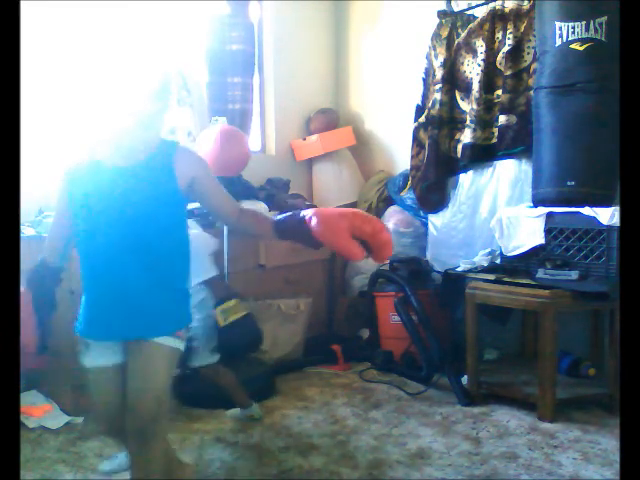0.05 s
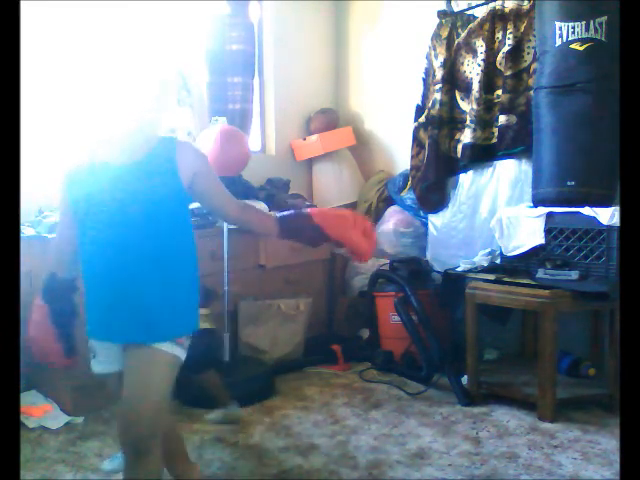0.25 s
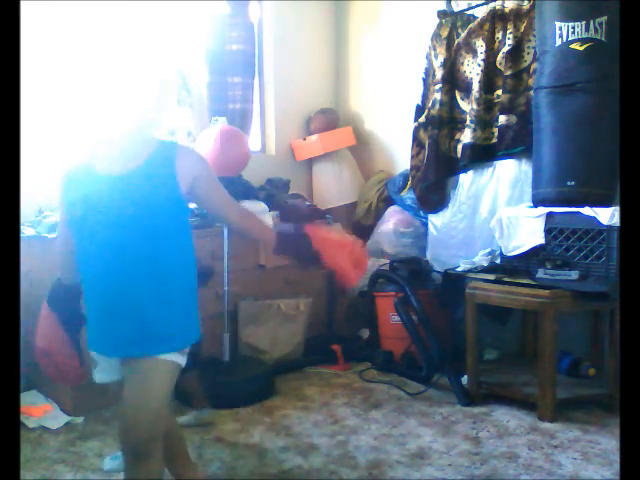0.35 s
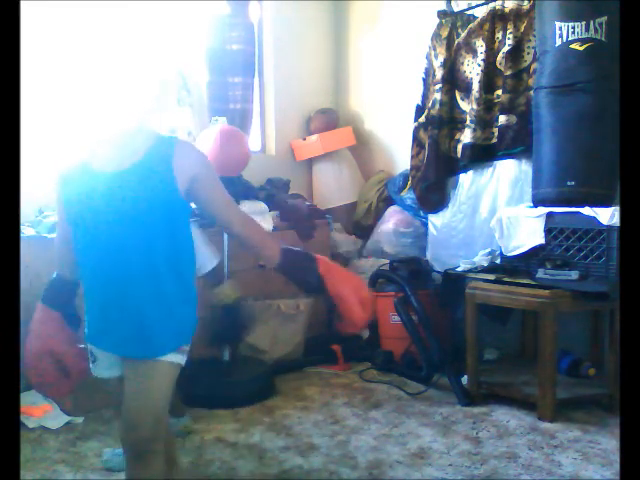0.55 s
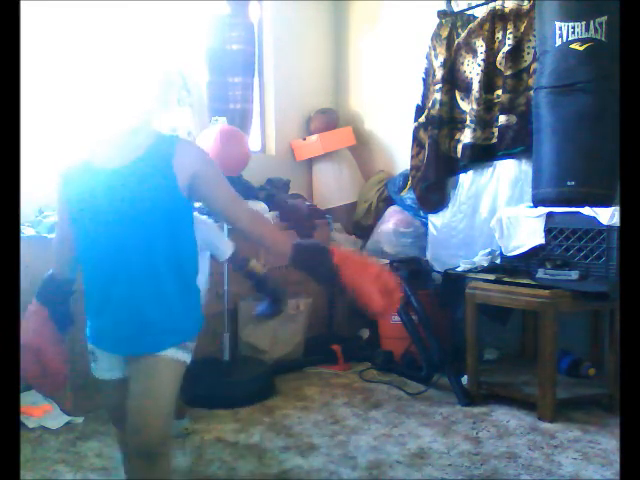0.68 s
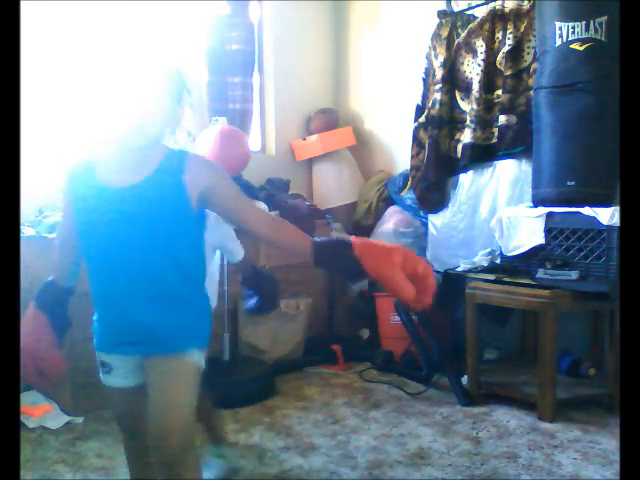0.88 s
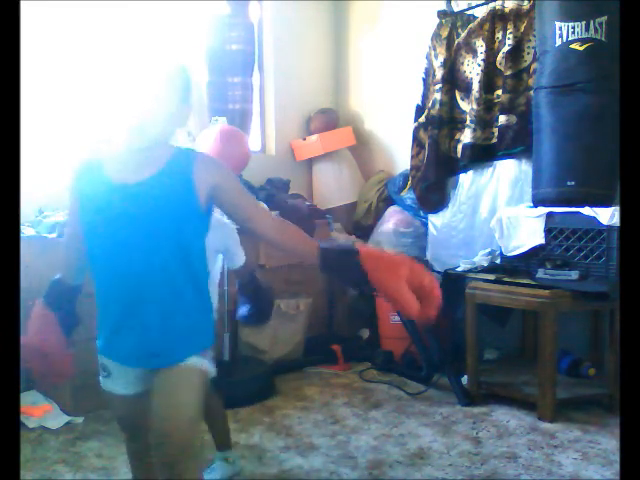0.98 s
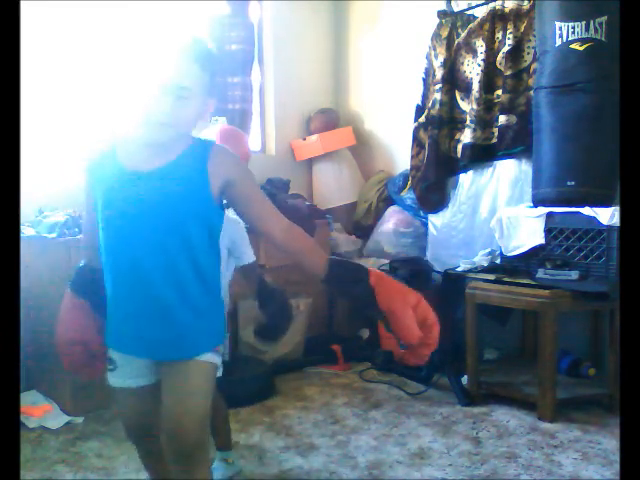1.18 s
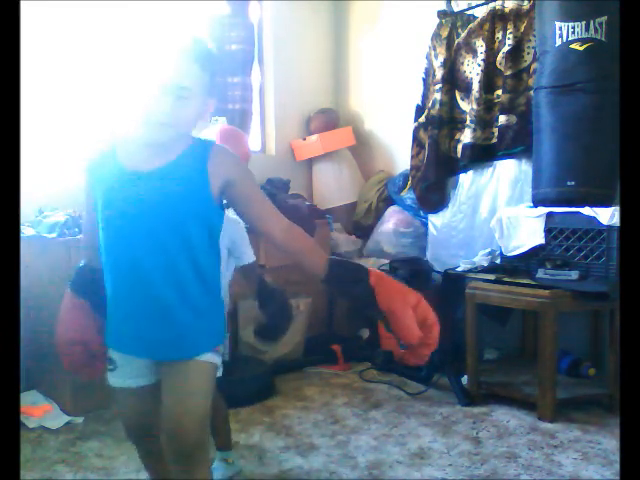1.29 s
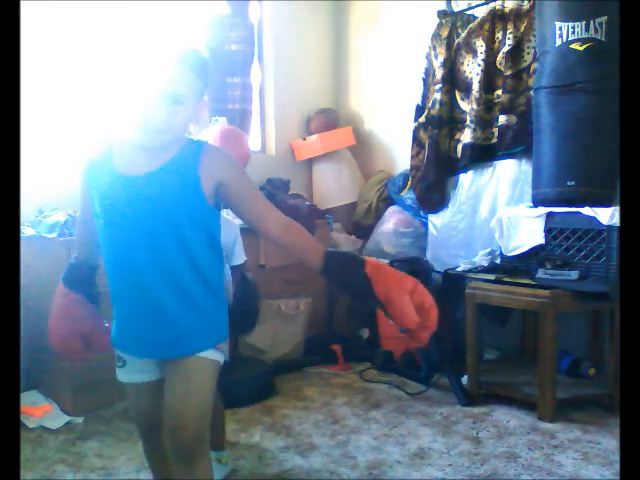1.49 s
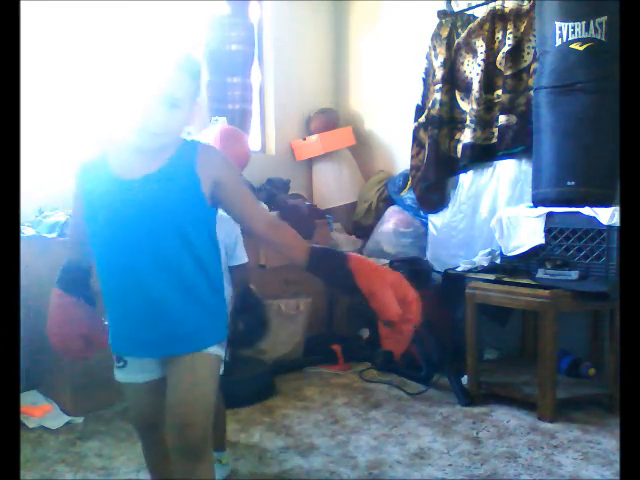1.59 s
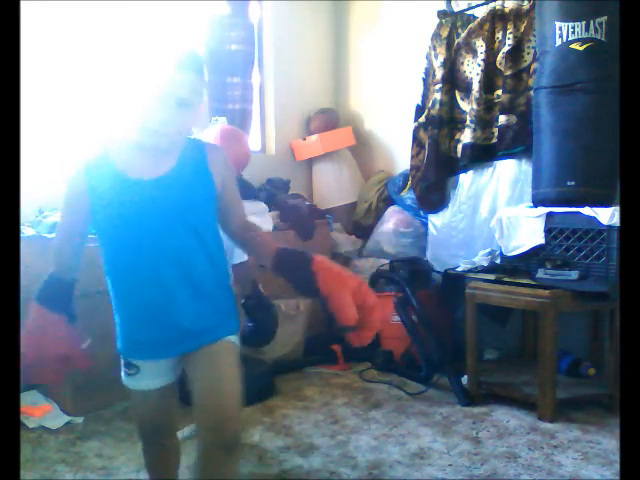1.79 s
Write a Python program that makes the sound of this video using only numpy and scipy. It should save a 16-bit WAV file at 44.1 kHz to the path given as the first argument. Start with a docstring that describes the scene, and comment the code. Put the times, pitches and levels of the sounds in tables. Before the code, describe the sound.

Dull footsteps land on a carpeted wooden floor, heard from close by. A heavy step thumps at about 0.2 seconds with a short rumble, followed by light foot contacts. A second heavy step comes at about 1.1 seconds, its low rumble lingering briefly, and a last light one at 1.5 seconds. Feet and clothes brush faintly in between, and a low room hum continues throughout.

```python
"""Footsteps on a carpeted wooden floor, heard from close by.
From the start a low drone, mains hum and room noise sound, and feet and clothes brush faintly.
At 0.2 s a heavy step lands: heel and ball each drive the low modes of floor and room, slap the carpet
and leave a short dull rumble. Light contacts follow, a second heavy step at 1.06 s whose rumble lingers,
and a last light one at 1.54 s. Throughout, a cheap recorder adds a thin buzz near 4 kHz to loud bass."""
import sys
import numpy as np
from scipy import signal
from scipy.fft import rfft, irfft, next_fast_len
from scipy.io import wavfile
from scipy.ndimage import map_coordinates

SR = 44100
rng = np.random.default_rng(int(sys.argv[2]) if len(sys.argv) > 2 else 0)


def to_wav(s):
    """Save 16-bit WAV."""
    ch = np.atleast_2d(s).T  # columns
    pcm = np.round(np.clip(ch, -1, 1) * 32767)  # PCM
    wavfile.write(sys.argv[1], SR, pcm.astype(np.int16))


N = 81585

# Faint overtones of the drone: f/Hz, level/dB
DRONE_OVERTONES = [(308, -78.5), (366, -73.5), (631, -80), (788, -81), (903, -79.5), (1129, -87),
                   (1890, -90.5), (2100, -91)]
# Spectrum of the room noise: f/Hz, relative density/dB
AIR_SPECTRUM = [(25, -14.5), (55, 2.5), (100, 3), (200, -4.5), (400, -8), (700, -12.5), (1000, -15.5),
                (2000, -23.5), (2900, -32.5), (5000, -34.5), (9000, -38), (11500, -45.5), (15000, -55)]
# Feet and clothes brushing; the 119 Hz row is low rumble lingering after the second heavy step:
# middle t/s, length/s, level/dB, centre f/Hz, width/octaves
NOISE_SWELLS = [(0.022, 0.1, -68.5, 1540, 0.21), (0.102, 0.068, -60.5, 840, 0.23),
                (0.328, 0.076, -63.5, 668, 0.51), (0.638, 0.13, -66.5, 650, .6),
                (0.859, 0.085, -74, 1796, .3), (0.901, 0.04, -82, 3160, 0.057),
                (0.952, 0.053, -64, 506, 0.62), (1.14, 0.13, -59.5, 334, 0.48),
                (1.165, 0.15, -77.5, 1540, 0.18), (1.17, 0.14, -47, 119, 0.14),
                (1.316, 0.037, -68.5, 1260, 0.22), (1.387, 0.053, -65, 525, 0.36),
                (1.536, 0.062, -63.5, 737, 0.61), (1.554, 0.049, -84.5, 8700, 0.13)]
# Foot contacts: t/s, force level/dB, softness (time constant)/ms, rumble level/dB, slap level/dB
CONTACTS = [(0.2112, 2, 0.52, -38, -40.5), (0.2169, .2, 0.74, -43, -60), (0.2563, 0.5, 0.94, -46.5, -65),
            (0.2831, -16.5, 0.94, -44, -62), (0.317, -20.5, 0.8, -45.5, -59), (0.4438, -22, 2.13, -57, -59),
            (1.054, -22, 1.33, -55.5, -60), (1.0622, -2.5, 1.64, -56, -69), (1.0701, -9, 1.78, -54, -68),
            (1.169, -22, 2.1, -56.5, -72), (1.1853, -17.5, 2.7, -45, -72), (1.221, -22, 2.8, -59, -68),
            (1.538, -32, 2.3, -46.5, -55)]
# Normal modes of the wooden floor: f/Hz, level/dB, T60/s
FLOOR_RESONANCES = [(37.3, -18, .24), (74.7, -1.5, 0.075), (85, -5.5, 0.097), (121.3, -16.5, 0.085),
                    (129.4, -13, 0.035), (147.5, -28, 0.19), (168, -43.5, 0.053), (202.9, -22.5, 0.22),
                    (256, -27, 0.27)]
# Standing waves between the walls: f/Hz, level/dB, T60/s
ROOM_MODES = [(58.38, -15, 0.58), (118.6, -36, 0.61)]
# Spectrum of a sole meeting carpet: f/Hz, relative density/dB
SLAP_SPECTRUM = [(100, -15), (300, 3.5), (520, 3.5), (750, -17.5), (1300, -29.5), (3000, -51.5),
                 (8000, -91.5)]
# Spectrum of the rumble of room and furniture: f/Hz, relative density/dB
RUMBLE_SPECTRUM = [(25, -19.5), (50, -3.5), (130, 3.5), (190, -2.5), (270, -5.5), (350, -11.5), (600, -25),
                   (1000, -37.5), (2500, -71.5), (8000, -100)]
# Modulation at 1, 2 and 3 times BUZZ_HZ: depth/dB
BUZZ_DEPTHS = [-51.5, -67.5, -77.5]

DRONE_HZ, DRONE_DB, DRONE_WAVER_DB = 58.3, -49.5, 0.8
MAINS_HZ, MAINS_DB = 123.1, -52.5
AIR_DB, AIR_WAVER_DB = -58, -0.21
LOW_CUT_HZ, BUZZ_HZ, BAND_LIMIT_HZ = 21.4, 3900, 15200


def amp(db):
    """Amplitude ratio of a level in decibels."""
    return 10 ** (np.asarray(db) / 20)


def unit(x):
    """Normalisation to an rms of 1."""
    return x / np.sqrt(np.mean(x ** 2) + 1e-20)


def since(start_s):
    """Seconds elapsed since start_s, zero before it."""
    return np.maximum(np.arange(N) / SR - start_s, 0)


def filtered(x, response):
    """Linear filtering: the spectrum of x is multiplied by a frequency response."""
    size = next_fast_len(N + SR)
    return irfft(rfft(x, size) * response(np.fft.rfftfreq(size, 1 / SR)), size)[:N]


def noise(spectrum):
    """Spectral shaping: noise of rms 1 follows (f/Hz, level/dB) points on a log frequency axis."""
    f, db = np.transpose(spectrum)
    response = lambda hz: amp(np.interp(np.log(hz + 1), np.log(f + 1), db))
    return unit(filtered(rng.standard_normal(N), response))


def wobble(rate):
    """Spline interpolation: a smooth curve through `rate` random values a second."""
    return map_coordinates(rng.standard_normal(256), [np.arange(N) * rate / SR], mode="mirror")


def ring(hz, db, t60_s):
    """Impulse response of a damped oscillator, falling 60 dB in t60_s."""
    t = since(0)
    return amp(db - 60 * t / t60_s) * np.sin(2 * np.pi * hz * t)


def burst(start_s, db, spectrum, rise_s, t60_s):
    """Exponential rise and decay of coloured noise."""
    t = since(start_s)
    return noise(spectrum) * (1 - np.exp(-t / rise_s)) * amp(db - 60 * t / t60_s)


def hum():
    """Periodic vibration gives a line spectrum: a drone, probably a fan motor, and steady mains hum."""
    t = since(0)
    drone = amp(DRONE_DB + DRONE_WAVER_DB * wobble(rate=5.5)) * np.sin(2 * np.pi * DRONE_HZ * t)
    whines = sum(amp(db) * np.sin(2 * np.pi * hz * t + wobble(rate=14)) for hz, db in DRONE_OVERTONES)
    mains = amp(MAINS_DB) * np.sin(2 * np.pi * MAINS_HZ * t)
    return np.sqrt(2) * (drone + whines + mains)  # the levels are rms


def room_air():
    """Random pressure fluctuations give a continuous spectrum; its level wavers slightly."""
    return amp(AIR_DB + AIR_WAVER_DB * wobble(rate=6.5)) * noise(AIR_SPECTRUM)


def brushes_and_lingering_rumble():
    """Noise bands swell and fade: friction of feet and cloth, and a low rumble, probably a room mode."""
    t, sound = since(0), np.zeros(N)
    for middle_s, length_s, db, centre_hz, octaves in NOISE_SWELLS:
        band = lambda hz: np.exp(-.5 * (np.log2((hz + 1) / centre_hz) / octaves) ** 2)
        envelope = amp(db) * np.exp(-2 * ((t - middle_s) / length_s) ** 2)
        sound += envelope * unit(filtered(rng.standard_normal(N), band))
    return sound


def thumps():
    """Modal superposition: force pulses, rounded by the carpet, ring the modes of floor and room."""
    force = np.zeros(N)
    for start_s, db, softness_ms, _, _ in CONTACTS:
        age = since(start_s) * 1000 / softness_ms
        push = age ** 2 * np.exp(-age)
        force += amp(db) * push / push.sum()
    # Neighbouring floor modes swing opposite ways.
    floor = sum((-1) ** k * ring(*mode) for k, mode in enumerate(FLOOR_RESONANCES))
    room = sum(ring(*mode) for mode in ROOM_MODES)
    return signal.fftconvolve(force, floor - room)[:N]


def slaps():
    """Impact noise: each sole meets the carpet with a brief, soft burst."""
    return sum(burst(start_s, db, SLAP_SPECTRUM, rise_s=0.00041, t60_s=0.047)
               for start_s, _, _, _, db in CONTACTS)


def rumble():
    """Reverberation: room and furniture answer each contact with dull, quickly dying noise."""
    return sum(burst(start_s, db, RUMBLE_SPECTRUM, rise_s=0.0019, t60_s=0.3)
               for start_s, _, _, db, _ in CONTACTS)


def scene():
    """Superposition: the pressures of all sources add at one microphone."""
    return (hum() + room_air() + brushes_and_lingering_rumble() + thumps() + slaps() + rumble())[None]


def record(dry):
    """Amplitude modulation in a band-limited recorder puts faint sidebands around multiples of BUZZ_HZ."""
    t = since(0)
    sound = signal.sosfilt(signal.butter(2, LOW_CUT_HZ, "high", fs=SR, output="sos"), dry[0])
    carriers = sum(amp(db) * np.cos(2 * np.pi * k * BUZZ_HZ * t) for k, db in enumerate(BUZZ_DEPTHS, 1))
    return filtered(sound * (1 + carriers), lambda hz: hz < BAND_LIMIT_HZ)[None]


dry = scene()
out = record(dry)
to_wav(out)
```